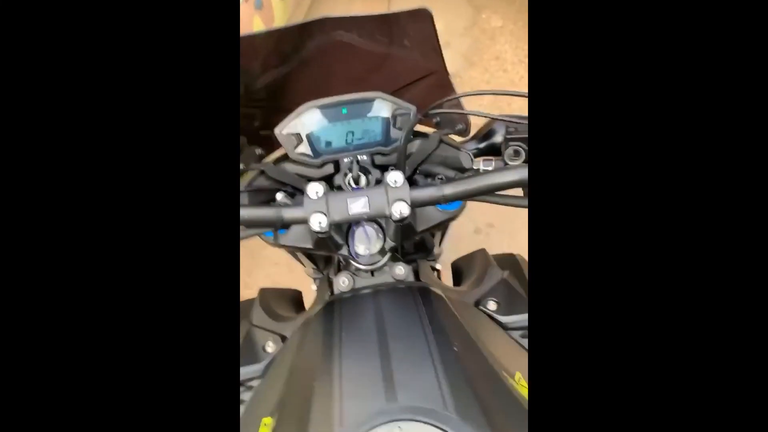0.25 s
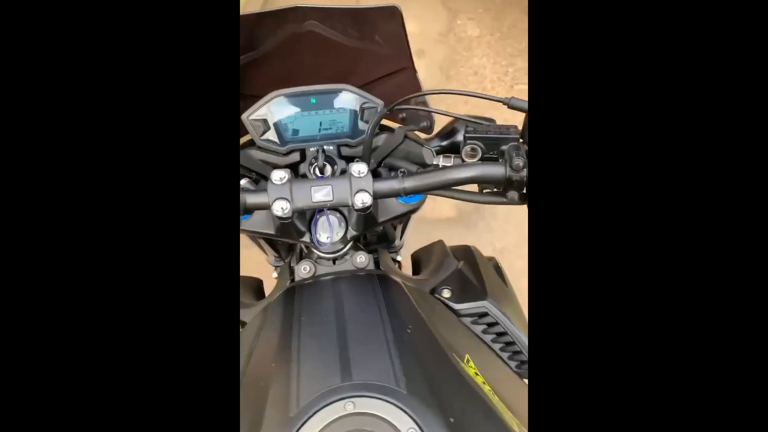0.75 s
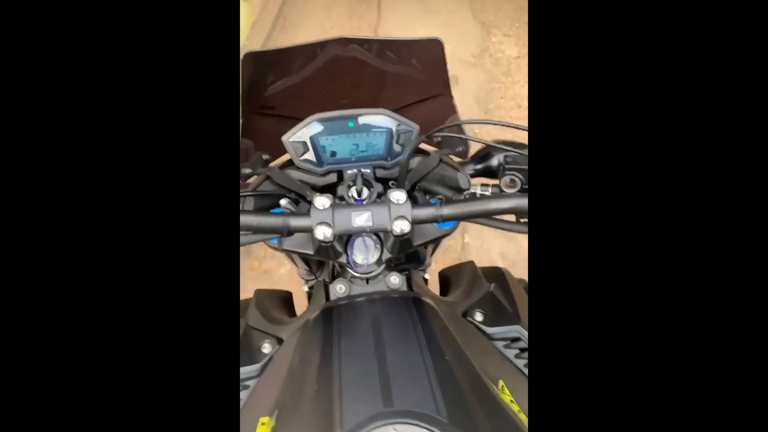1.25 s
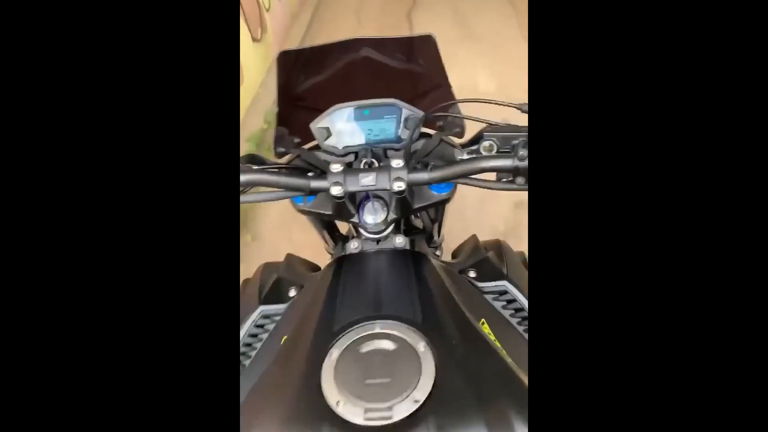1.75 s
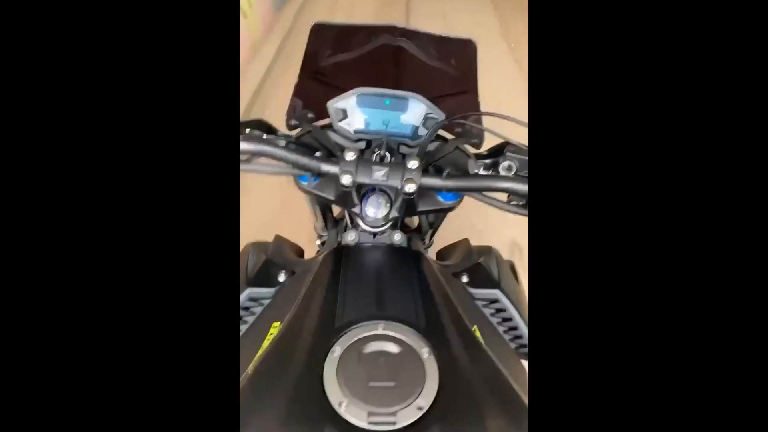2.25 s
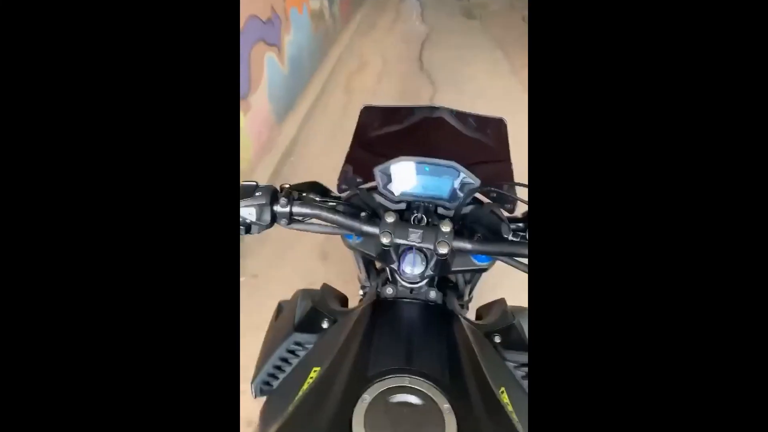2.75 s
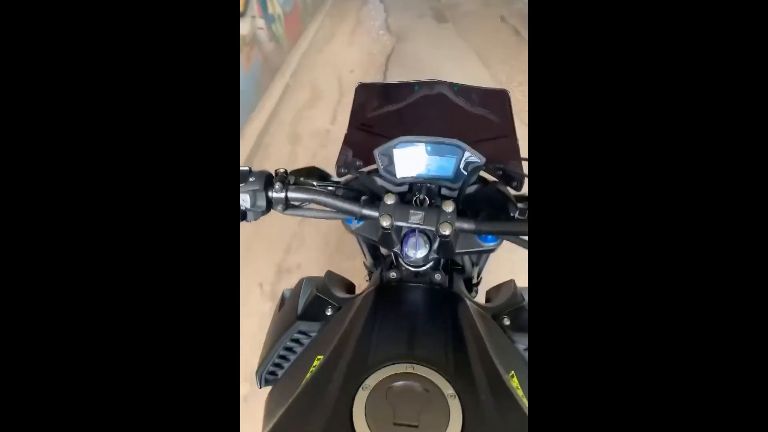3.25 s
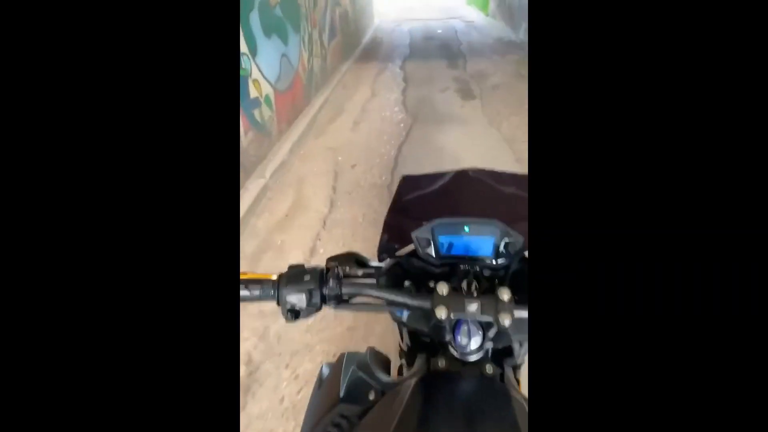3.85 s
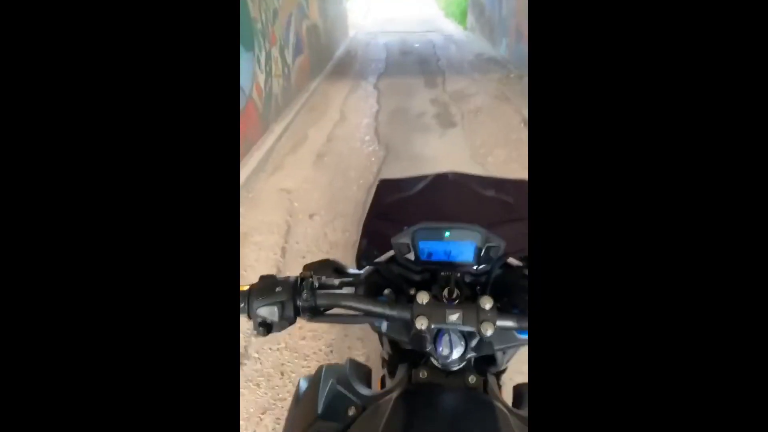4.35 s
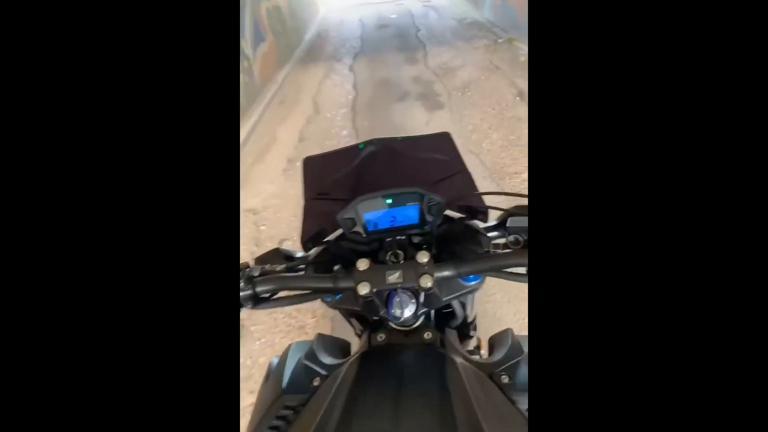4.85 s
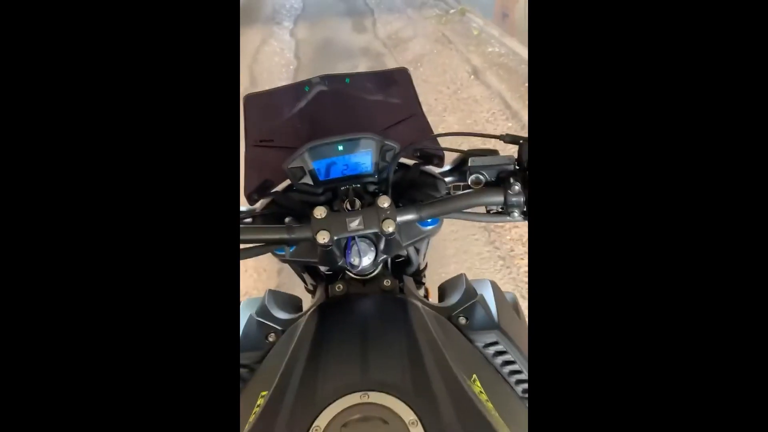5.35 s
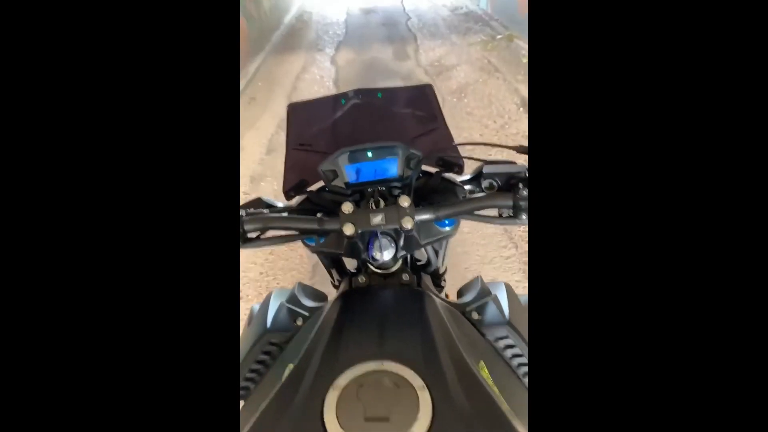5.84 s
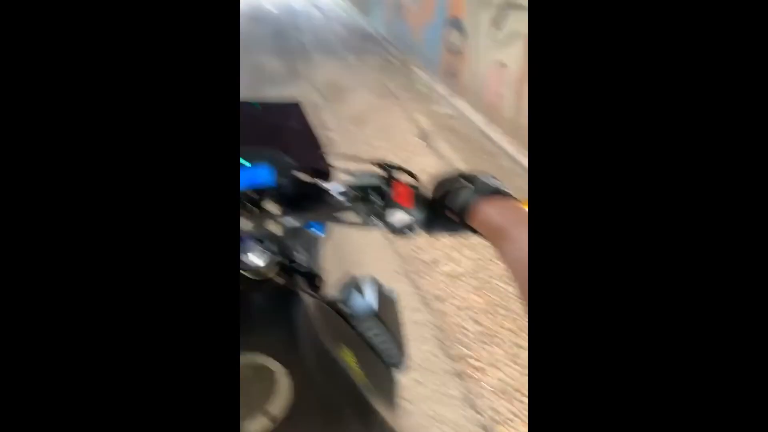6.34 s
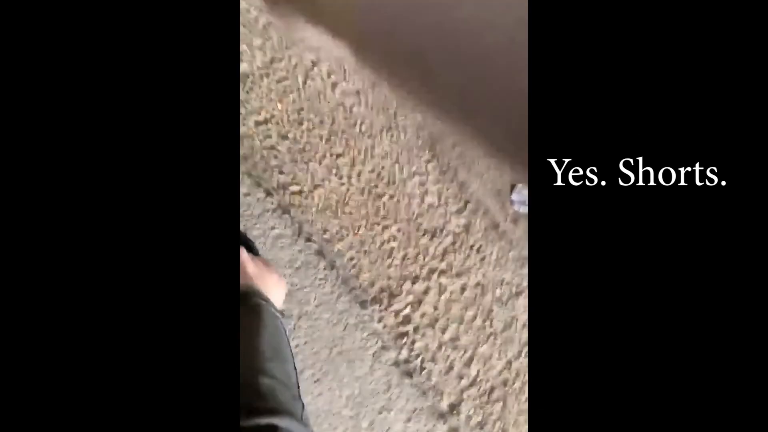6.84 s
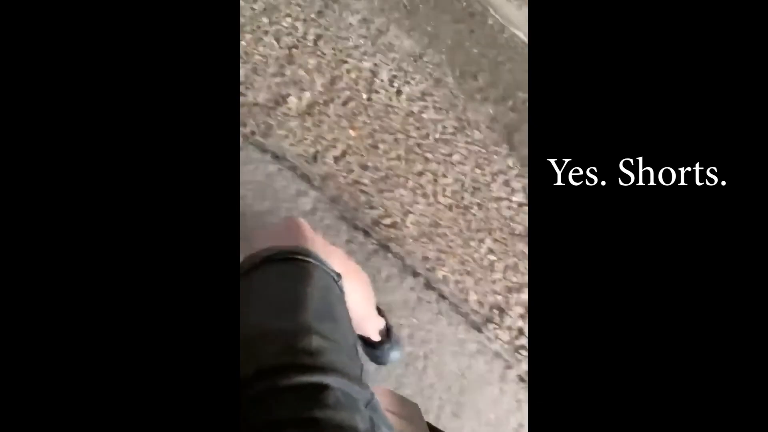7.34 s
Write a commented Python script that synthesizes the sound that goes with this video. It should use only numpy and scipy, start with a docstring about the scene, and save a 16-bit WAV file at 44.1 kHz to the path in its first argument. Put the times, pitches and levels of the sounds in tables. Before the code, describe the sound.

From the saddle inside a concrete underpass, a two-cylinder motorcycle idles low and lumpy, its firings in uneven pairs, with soft gas and valve noise and faint distant rumble. At about 1.2 s a short throttle blip snaps the engine up with little pops; it drops back to idle by 2.3 s, with a sharp tick near 1.5 and dull pops around 2.5. At 3.0 s a stronger rev surges, and deep, nearly pure tones boom between the walls as the speed slides down until 4.7. A harder, raspier rev at 4.8 peaks near 5.05, then falls with lingering hum; a tick sounds at 5.5. Near 6.6 to 6.8 small pops and a tick accompany the return towards idle. At 7.1 the hum briefly drops out, then the highest rev roars with bright rushing gas, still climbing as it cuts off at 7.6.

```python
"""In a concrete underpass, heard from the saddle, a two-cylinder motorcycle idles in uneven firing pairs.
Each firing rings exhaust filters; gas and valve noise rushes with the speed; small parts tick, exhaust pops.
Then the throttle is twisted four times; standing waves between the walls, swelling tones and narrow
resonances, boom on, and decaying noise gives the diffuse tail. As the last rev begins the hum drops out
briefly; the speed is still climbing at the end. Air and far traffic rumble throughout."""
import sys
import numpy as np
from scipy import signal
from scipy.fft import rfft, irfft, next_fast_len
from scipy.io import wavfile
from scipy.ndimage import uniform_filter1d

SR = 44100
rng = np.random.default_rng(int(sys.argv[2]) if len(sys.argv) > 2 else 0)


def int16_out(signal):
    """Quantize to a 16-bit WAV file."""
    q = np.round(np.clip(np.atleast_2d(signal).T, -1, 1) * 32767)
    wavfile.write(sys.argv[1], SR, q.astype(np.int16))


N = 334983  # length in samples

# Engine speed: time_s, four-stroke cycles_per_s
ENGINE_SPEED = [(0, 10.1), (1.19, 10.1), (1.24, 15), (1.3, 23.5), (1.41, 22.5), (1.55, 18.5), (1.824, 15.8),
                (1.9, 13), (2.056, 12.2), (2.316, 10.4), (2.94, 10.3), (3.1, 36), (3.4, 30.3), (3.52, 26.7),
                (3.93, 18.5), (4.29, 13.4), (4.7, 11), (4.88, 27), (5.05, 44), (5.4, 35.6), (5.68, 30.3),
                (5.79, 26.7), (6.48, 13.4), (6.98, 10.5), (7.17, 27), (7.3, 40), (7.39, 54.5), (7.5, 59),
                (7.6, 60)]
# Twists of the throttle: opens_s, shuts_s, opening (0-1)
THROTTLE_TWISTS = [(1.18, 1.26, 0.87), (2.963, 3.103, 0.18), (4.753, 4.986, 1), (7.122, 7.444, 0.91)]
IDLE_HZ = 10.1  # cycles per second
OPEN_S, SHUT_S = 0.052, 0.051  # time constants of the engine's answer to the throttle

# Layer level rules, by layer name: idle_db, db_per_doubling of speed, full_throttle_db (added)
LAYER_LEVELS = {"thud": (-35.5, -1, 0.79), "beat": (-33.5, 0.36, 12.5), "bark": (-53, 7.86, 10.3),
                "rush": (-51.5, 8.87, 5), "rasp": (-45.5, 7.09, 5.6)}
# How loudly the engine's thud, beat, and bark with gas come through over time: time_s, thud_db, beat_db,
# bark_and_gas_db
ENGINE_REACH = [(0, 0.5, -0.5, 1.5), (1.18, -6, 0, 0), (1.3, 8, 4, -1), (1.5, 8.5, 7.5, -0.5),
                (2.0, -3, -5.5, -3), (2.9, -0.5, -1.5, 5), (3.2, 12, 8.5, 4), (3.6, 8, -6, 3.5),
                (4.2, -8, -4.5, 2), (4.7, -5, 2.5, 2), (4.85, -1, 1, 2.5), (5.1, -7.5, -9, 3),
                (5.8, -2, -3, -3), (6.5, -12, -17.5, -5), (7.0, -3, -2.5, -0.5), (7.22, 0, -4, -1),
                (7.34, -3, -1, -1.5), (7.45, 6, -5, -0.5), (7.6, -7, 1, 2.5)]
# Brief changes of the gas noise: time_s, length_s, rush_db, rasp_db
GAS_SURGES = [(1.238, 0.0083, 6, 4.5), (2.971, 0.0067, 3.5, 4), (2.364, 0.18, 8, 7.5),
              (2.785, 0.015, -2, 8), (3.394, 0.024, -1, 6.5), (4.427, 0.039, 7, 2.5),
              (4.717, 0.013, 4, -0.5), (6.669, 0.029, 5.5, 8)]

# Slow push of the silencer: frequency_hz, relative_db
THUD_BODY = [(10, -52), (28, -19.5), (42, 0), (56, 4), (72, -4), (150, -67.5)]
# Exhaust pipe's answer to one firing: frequency_hz, relative_db
BEAT_BODY = [(30, -58.5), (62, -4.5), (90, 9.5), (125, 4.5), (165, -18), (240, -18), (380, -20),
             (1000, -55.5), (3000, -81.5)]
# Exhaust's answer to a hard firing: frequency_hz, relative_db
BARK_BODY = [(60, -75), (130, -5), (235, 3), (330, -5.5), (600, -14.5), (750, -5), (1050, -31.5),
             (2500, -45)]

# Rushing gas noise: frequency_hz, relative_db_per_hz
RUSH_SPECTRUM = [(530, -28.5), (900, -3), (1100, -8.5), (1800, 1.5), (2090, 0), (2990, -4.5), (3600, -9),
                 (4340, -7.5), (8600, -26.5), (9300, -49), (12100, -58.5), (20500, -120)]
# High hiss of the gas, rising and falling with the rush: frequency_hz, relative_db_per_hz
FIZZ_SPECTRUM = [(3000, -63.5), (5000, -9.5), (7000, -3.5), (8800, -6.5), (9500, -14)]
# Lower, rasping gas and valve noise: frequency_hz, relative_db_per_hz
RASP_SPECTRUM = [(60, -44), (150, 3), (300, -1.5), (420, -1.5), (650, -0.5), (900, -3.5), (1150, -11),
                 (1700, -11.5), (2900, -98)]

# Ticks of small parts: time_s, peak_db
PART_TICKS = [(.1993, -56), (1.221, -28), (1.5424, -15), (2.1621, -27.5), (4.6998, -47), (5.4901, -14),
              (6.8128, -17.5)]
# Exhaust pops: start_s, level_db (before attack and decay), pitch_hz
EXHAUST_POPS = [(0.429, -25, 900), (1.225, -23, 770), (1.247, -14, 960), (1.485, -17, 706),
                (1.769, -22, 690), (2.47, -32, 662), (2.496, -19, 500), (2.557, -24, 660),
                (2.784, -28, 651), (2.796, -25, 850), (6.641, -25, 1570), (6.655, -25.5, 1040),
                (6.669, -30, 659), (6.767, -35, 651), (6.802, -32.5, 880), (6.832, -45, 703)]

# Four standing waves, each a list of swells as engine orders cross it: time_s, pitch_hz, level_db, t60_s
WAVE_CROSSINGS = [
    [(1.8, 105, -27, 0.68), (2.08, 106.5, -31.5, 0.63), (2.75, 107.5, -36.5, 2.3),
     (3.035, 110, -21.5, 0.88), (3.12, 109, -17, 0.62), (3.5, 108.5, -13, 1.26), (3.78, 107.5, -22, 2),
     (4.08, 107, -17, 1.9), (4.29, 106.6, -16.5, 0.98), (4.75, 106, -19, 1.2), (4.93, 104.5, -14.5, 2.64),
     (5.4, 106, -15.5, 1.14), (5.79, 107, -14.5, 2.6), (6.2, 105.5, -20, 2.5), (6.45, 106.3, -17, 2.7),
     (7.18, 108.8, -19, 2.7), (7.46, 106, -23.5, 0.82)],
    [(2.32, 118, -31, 2), (3.015, 119, -21, 0.46), (3.39, 119.5, -14.5, 0.53), (3.64, 122.5, -20, 2.32),
     (3.9, 121, -20.5, 2.46), (4.48, 123, -22, 1.6), (4.82, 122, -21.5, 0.39), (5.04, 120.5, -15.5, 1.1),
     (5.3, 121.5, -15.5, 1.32), (5.67, 122.3, -13, 0.96), (6.2, 120.5, -30, 2), (6.38, 121.5, -23, 1.6),
     (6.74, 122, -29.5, 1.6), (7.0, 123, -28, 2), (7.31, 120.7, -19.5, 1.3)],
    [(3.12, 158.5, -38, 1.6), (3.5, 160.3, -37, 1.5), (3.95, 158.8, -27.5, 0.84), (4.76, 162.5, -35, 3.2),
     (5.06, 160, -20.5, 1.7), (5.38, 160.6, -27, 0.93), (5.75, 160.5, -30.5, 3.9), (6.05, 160.5, -28, 3.2),
     (6.68, 161.3, -32, 0.72), (7.0, 161.7, -35.5, 1.3), (7.28, 162, -29, 0.76)],
    [(3.25, 209.6, -34.5, 1.5), (4.22, 209.8, -40.5, 1.6), (5.0, 211, -34.5, 3.8), (5.25, 210.7, -27, 1.05),
     (6.05, 210.6, -38.5, 5.5), (6.8, 210.6, -40.5, 3.7), (7.25, 211, -37.5, 2.7)],
]
SWELL_S = 0.065  # a swell is 9 dB down this long before its peak
# Weaker standing waves: pitch_hz, width_hz, relative_db
WALL_RESONANCES = [(201.6, 3.2, 5.5), (237.9, 0.93, 17.5), (264.3, 1.2, 11), (300, 0.81, 1),
                   (317.8, 2.6, 11.5), (358.8, 6.4, 9), (433.3, 1.7, 11), (477.6, 0.83, 13.5),
                   (545, 1.1, 14.5), (588, 2.1, 13.5), (646, 1.7, 12), (734.4, 7.1, 3), (851, 3.3, 9),
                   (968, 11, -5.5), (1481, 21, 7), (1625, 10, 1.5), (2610, 39, -0.5)]
# Gain of the weaker standing waves: time_s, gain_db
WALL_GAIN = [(0, 6.5), (2.3, -4), (3.0, 3), (6, 3), (7.6, 10.5)]
# Decay of the diffuse tail: frequency_hz, t60_s
TUNNEL_DECAY = [(60, 3), (500, 3.4), (2000, 0.69), (8000, 2.5)]
# Brief dropout of the hum: time_s, gain_db
HUM_DIP = [(7.095, 0), (7.106, -20), (7.126, -20), (7.136, 0)]
# Air and far traffic: frequency_hz, relative_db_per_hz
RUMBLE_SPECTRUM = [(8, -44.5), (22, -1), (35, 6), (70, -7.5), (150, -18), (400, -51)]
TOP_HZ = 9200  # upper edge of the sound, Hz


def engine():
    """Firing pulses ring the exhaust as thud, beat and bark; gas and valve noise swells with each firing."""
    fire = firings(lag=0.235, second_db=0.2, scatter_db=1.8, start=1.12)
    exhaust_db, (rush_db, rasp_db) = layer_levels()
    exhaust = np.zeros(N)
    for db, body in zip(exhaust_db, (THUD_BODY, BEAT_BODY, BARK_BODY)):
        exhaust += amp(db) * unit(filtered(-fire, causal(body)))

    puff_decay = amp(-60 * np.arange(4000) / SR / 0.078)  # t60 of 0.078 s
    puff = unit(signal.fftconvolve(fire, puff_decay)[:N])
    rush = amp(rush_db) * unit((1 + 0.18 * puff) * noise(RUSH_SPECTRUM, patchy_db=1.5))
    fizz = amp(0.96 * rush_db - 20.5) * noise(FIZZ_SPECTRUM, patchy_db=6.5)
    rasp = amp(rasp_db) * unit((1 + 0.074 * puff) * noise(RASP_SPECTRUM, patchy_db=1.1))
    return exhaust, rush + fizz + rasp


def firings(lag, second_db, scatter_db, start):
    """Two pulses a cycle, lag cycles apart, then a long pause; power stays even as the speed changes."""
    speed, = curves(ENGINE_SPEED)
    turn = np.cumsum(speed) / SR + start
    cycles = np.arange(1, int(turn[-1]))
    size = amp(scatter_db * rng.standard_normal((400, 2)))[:len(cycles)]
    pulses = np.zeros(N)
    pulses[np.searchsorted(turn, cycles)] = size[:, 0]
    pulses[np.searchsorted(turn, cycles - lag)] = size[:, 1] * amp(second_db)  # the leading cylinder
    return pulses / np.sqrt(speed / SR)


def layer_levels():
    """Each layer follows speed and throttle by its own rule, then how loudly the engine comes through, and the
    gas surges."""
    t = np.arange(N) / SR
    doublings = np.log2(curves(ENGINE_SPEED)[0] / IDLE_HZ)
    throttle = np.zeros(N)
    for opens, shuts, opening in THROTTLE_TWISTS:
        rise = 1 - np.exp(-np.maximum(t - opens, 0) / OPEN_S)
        fall = np.exp(-np.maximum(t - shuts, 0) / SHUT_S)
        throttle += opening * rise * fall

    db = {}
    for name, (idle, faster, opened) in LAYER_LEVELS.items():
        db[name] = idle + faster * doublings + opened * throttle
    thud_db, beat_db, gas_db = curves(ENGINE_REACH)
    surges = np.zeros((2, N))
    for s, length, *change_db in GAS_SURGES:
        surges += np.outer(change_db, np.exp(-((t - s) / length) ** 2))
    exhaust_db = [db["thud"] + thud_db, db["beat"] + beat_db, db["bark"] + gas_db]
    return exhaust_db, [db["rush"], db["rasp"]] + gas_db + surges


def small_hits():
    """Dry ticks, each a single spike, and short hollow pops of unburnt gas, each a noisy decaying tone."""
    hits, t = np.zeros(N + SR), np.arange(1500) / SR
    spike = np.exp(-(np.arange(-6, 7) / 1.8) ** 2)  # widths in samples
    for s, db in PART_TICKS:
        hits[round(s * SR) - 6:][:13] += amp(db) * spike
    attack = 1 - np.exp(-t / 0.0006)
    for s, db, hz in EXHAUST_POPS:
        roughness = 0.3 * uniform_filter1d(rng.standard_normal(len(t)), size=8)
        ring = np.sin(2 * np.pi * hz * t) + roughness
        hits[round(s * SR):][:len(t)] += amp(db - 60 * t / 0.014) * ring * attack  # t60 of 0.014 s
    return hits[:N]


def boom(swells):
    """One standing wave as a pure tone: swells add in power, and the strongest pulls the pitch a little."""
    s, hz, db, t60 = np.transpose(swells)[..., None]
    coarse = np.arange(0, N, 64)  # envelope points, in samples
    after = coarse / SR - s
    loss_db = np.where(after < 0, 9 * (after / SWELL_S) ** 2, 60 * after / t60).clip(0, 200)
    power = amp(db - loss_db) ** 2
    total = power.sum(0)
    level = np.interp(np.arange(N), coarse, np.sqrt(total))
    pitch = np.interp(np.arange(N), coarse, (power * hz).sum(0) / total)
    turns = np.cumsum(pitch) / SR + rng.random()
    return np.sqrt(2) * level * np.sin(2 * np.pi * turns)


def standing_waves(x):
    """Narrow resonances between walls, floor and roof, as a sum of band-pass responses."""
    def response(f):
        total = 0
        for centre, width, db in WALL_RESONANCES:
            damping = 1j * f * width
            total = total + amp(db) * damping / (centre ** 2 - f ** 2 + damping)
        return total
    return filtered(x, response)


def reverberation(x):
    """The diffuse tail of the underpass: noise in which each frequency dies at its own speed."""
    hz, t, z = signal.stft(rng.standard_normal(2 * SR), SR, nperseg=1024)
    decay = amp(-60 * t / along(TUNNEL_DECAY, hz)[:, None])
    tail = signal.istft(z * decay, SR, nperseg=1024)[1]
    delayed = np.pad(x, (500, 0))  # samples before the tail starts
    return signal.fftconvolve(delayed, tail / np.linalg.norm(tail))[:N]


def rumble():
    """Air and far traffic as steady low noise."""
    return amp(-49.5) * noise(RUMBLE_SPECTRUM, patchy_db=-0.5)


def noise(spectrum, patchy_db):
    """Coloured noise of rms 1, with smooth random gain patches over time and frequency."""
    z = signal.stft(rng.standard_normal(N + 512), nperseg=512)[2]
    field = uniform_filter1d(rng.standard_normal(z.shape), 6, 0)
    field = uniform_filter1d(field, 8, 1)
    x = signal.istft(z * amp(patchy_db * unit(field)), nperseg=512)[1][:N]
    return unit(filtered(x, lambda hz: amp(along(spectrum, hz))))


def causal(points):
    """The minimum-phase response through (Hz, dB) points: it rings only after the pulse."""
    def response(hz):
        cepstrum = irfft(np.log(amp(along(points, hz)) + 1e-6))
        cepstrum[1:len(hz) - 1] *= 2  # fold the backward half onto the forward half
        cepstrum[len(hz):] = 0
        return np.exp(rfft(cepstrum))
    return response


def filtered(x, response):
    """x times a complex response of frequency, padded so that long ringing does not wrap."""
    m = next_fast_len(N + 4 * SR)
    return irfft(rfft(x, m) * response(np.fft.rfftfreq(m, 1 / SR)), m)[:N]


def along(points, hz):
    """Interpolate (Hz, value) points on a log frequency axis."""
    f, v = np.transpose(points)
    return np.interp(np.log(hz + 1), np.log(f + 1), v)


def curves(rows):
    """One value per sample for each column after the time."""
    s, *columns = np.transpose(rows)
    return [np.interp(np.arange(N) / SR, s, column) for column in columns]


def amp(db):
    """Decibels to amplitude ratio."""
    return 10 ** (np.asarray(db) / 20)


def unit(x):
    """Scale to rms 1."""
    return x / np.sqrt(np.mean(x ** 2) + 1e-20)


def scene():
    """The engine and its small hits at the saddle, the underpass around them, and the far rumble."""
    exhaust, gas = engine()
    hits = small_hits()
    booms = sum(boom(swells) for swells in WAVE_CROSSINGS)
    waves = amp(curves(WALL_GAIN)[0]) * standing_waves(exhaust + amp(-10) * gas)
    tail = reverberation(amp(-8) * (exhaust + hits) + amp(-9.5) * gas)
    hum = amp(curves(HUM_DIP)[0]) * (exhaust + booms + waves + tail)
    return (hum + gas + hits + rumble())[None]


def record(dry):
    """A very steep low-pass at the top edge."""
    return filtered(dry[0], lambda hz: 1 / (1 + (hz / TOP_HZ) ** 90))[None]


dry = scene()
out = record(dry)
int16_out(out)
```